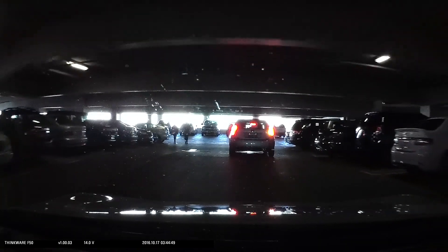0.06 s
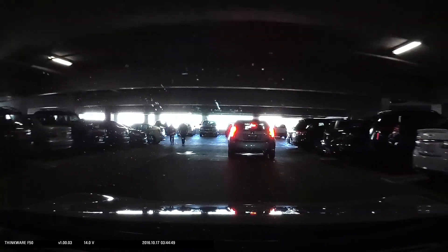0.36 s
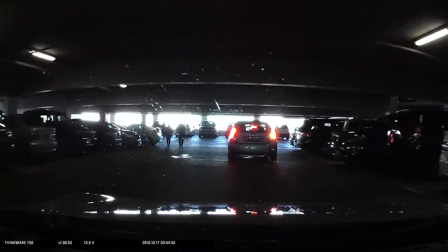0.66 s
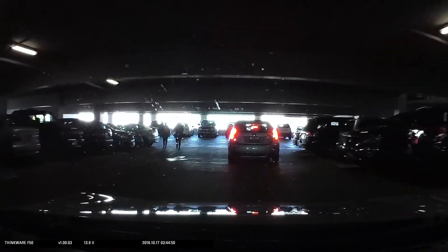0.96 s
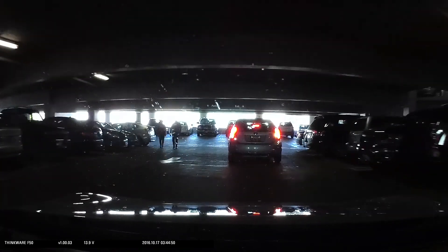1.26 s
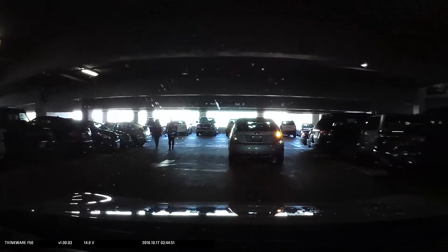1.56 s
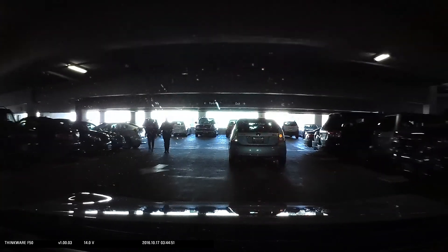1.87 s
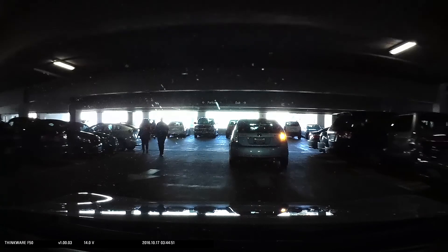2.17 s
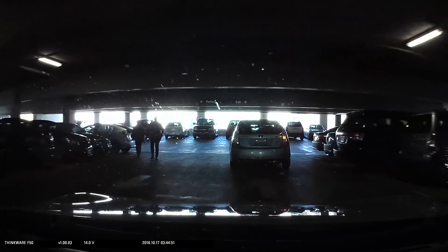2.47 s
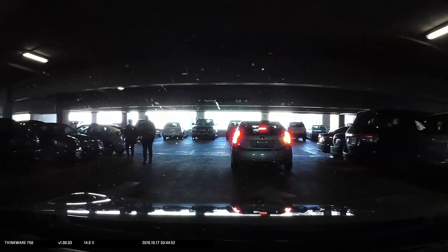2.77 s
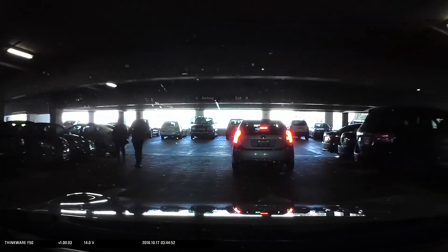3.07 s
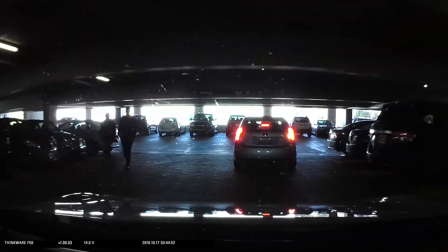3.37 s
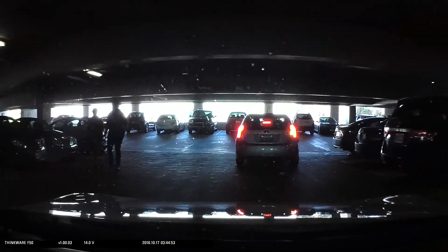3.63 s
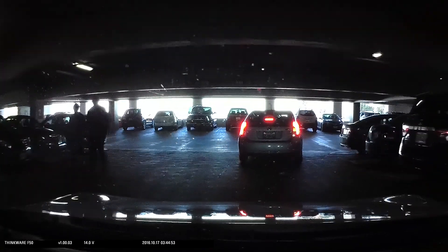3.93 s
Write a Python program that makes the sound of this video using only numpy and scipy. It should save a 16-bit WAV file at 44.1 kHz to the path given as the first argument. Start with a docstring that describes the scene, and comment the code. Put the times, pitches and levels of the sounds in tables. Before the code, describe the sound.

A car's low engine drone, heard from inside, falls in pitch as it slows through a parking garage. In the first 0.7 seconds tyres thump over floor joints, overloading the microphone and rattling trim. Softer bumps pass at 1 and 2 seconds as road noise ebbs. Around 3 seconds come small taps and a faint distant thud. A thin whine fades as the engine nears idle by 4 seconds.

```python
"""A car slows down in a concrete parking garage, heard from inside through a one-channel dashboard camera.
In the first 0.7 s the tyres thump over floor joints, overloading the microphone and shaking loose trim.
The exhaust drone sinks through the cabin's boom resonance, with a thin alternator whine tied to it.
Softer joints pass at 1 s and 2 s as road noise ebbs with the speed. Around 3 s come a few small taps
and a far thud; the whine dies away near idle, over steady ventilation and hiss."""
import sys
import numpy as np
from scipy.fft import rfft, irfft, next_fast_len
from scipy.io import wavfile
from scipy.ndimage import map_coordinates

SR = 44100
rng = np.random.default_rng(int(sys.argv[2]) if len(sys.argv) > 2 else 0)


def store_wav(level_fs):
    """Save 16-bit WAV to argv[1]."""
    pcm = np.round(np.clip(np.atleast_2d(level_fs), -1, 1) * 32767)
    wavfile.write(sys.argv[1], SR, pcm.T.astype(np.int16))


N = 176400


# engine firing rate: t/s, f/Hz
FIRING_HZ = [(0, 96.83), (.3, 84.52), (.38, 80.23), (.68, 67.25), (.87, 62.88), (1.0, 58.64), (1.44, 57.96),
             (1.68, 57), (2, 53.21), (2.42, 48.6), (2.7, 46.14), (3.05, 43.6), (3.5, 41.58), (4, 39.77)]
# firing note, before cabin gain: t/s, level/dB
FUNDAMENTAL_DB = [(0, -17), (.5, -23), (.8, -20), (1.0, -19.5), (1.4, -19.5), (1.8, -29.5), (2.05, -23.5),
                  (2.5, -26), (3.4, -18.5), (4, -24)]
# its octave, following the load, before cabin gain: t/s, level/dB
OCTAVE_DB = [(0, -29.5), (.42, -26), (.6, -16), (.7, -18.5), (.88, -16), (.97, -22.5), (1.04, -18),
             (1.3, -17), (1.62, -14), (1.8, -22.5), (2.1, -30), (2.6, -29.5), (3.4, -39), (4, -61)]
# higher orders, before cabin gain: multiple of firing rate, level/dB
UPPER_ORDERS = [(3, -30.5), (4, -33), (5, -49), (6.5, -35), (7, -40)]
# cabin response to the exhaust: f/Hz, gain/dB
CABIN_GAIN_DB = [(40, -8), (60, -1), (85, -0.5), (100, -1), (115, -2), (130, 0.5), (142, 5), (160, -5),
                 (171, -9), (184, -23), (335, -39), (374, -18), (410, -24)]

def exhaust(firing_hz, phase, burble_depth=.07, burble_hz=30, waver_db=.5):
    """Engine orders swell and fade through the cabin's resonances; uneven firings make them burble."""
    def order(multiple, db):
        gain = amp(db + along(CABIN_GAIN_DB, multiple * firing_hz))
        burble = 1 + burble_depth * wobble(burble_hz)
        jitter_rad = burble_depth * wobble(burble_hz)
        return np.sqrt(2) * gain * burble * np.sin(multiple * phase + jitter_rad)
    drone = order(.99, curve(FUNDAMENTAL_DB)) + order(2, curve(OCTAVE_DB))
    return drone + sum(order(multiple, db + waver_db * wobble(8.5)) for multiple, db in UPPER_ORDERS)


# floor joints: t/s, boom level/dB, boom f/Hz, boom width/s, knock level/dB
JOINTS = [(.078, -11, 145.9, 0.015, -46.5), (.131, -6, 134, .0068, -25.5), (.167, -10.5, 144.1, .02, -39),
          (0.367, -7, 124.2, 0.011, -36), (0.59, -23, 135, 0.011, -33.5), (0.617, -13, 134, 0.0065, -26.5),
          (0.649, -12, 108, 0.015, -47), (.991, -19.5, 146, .06, -54.5), (1.971, -22, 159.3, 0.014, -55.5)]
# knock spectrum: f/Hz, level/dB
KNOCK_SPECTRUM = [(100, -8.5), (240, -1), (370, 6), (600, -8.5), (1000, -16), (1700, -27), (4000, -43),
                  (9000, -55)]
# spectrum of the knock's edge: f/Hz, level/dB
CRACK_SPECTRUM = [(500, 0), (1200, -3), (3000, -14), (12000, -27)]

def floor_joints(rise_s=.0025, decay_s=.011, crack_rel_db=-13, crack_delay_s=.0005):
    """Each joint under the tyres makes the cabin boom, with a short, crisp-edged knock."""
    boom, knock, crack = np.zeros((3, N))
    for at_s, boom_db, boom_hz, width_s, knock_db in JOINTS:
        boom += amp(boom_db) * swell(at_s, width_s) * np.cos(2 * np.pi * boom_hz * (clock() - at_s))
        knock += amp(knock_db) * strike(at_s, rise_s, decay_s)
        crack += amp(knock_db + crack_rel_db) * swell(at_s + crack_delay_s, width_s=.0008)
    return boom + knock * noise(KNOCK_SPECTRUM) + crack * noise(CRACK_SPECTRUM)


# body rumble: t/s, level/dB
RUMBLE_DB = [(0, -19.5), (.7, -20), (1.2, -25), (1.7, -27.5), (2, -22.5), (2.3, -29), (3, -31.5),
             (3.5, -28.5), (4, -29)]
# rumble spectrum: f/Hz, level/dB
RUMBLE_SPECTRUM = [(10, -6.5), (22, -4), (35, -3.5), (55, -7), (82, -15), (130, -11.5), (160, -11),
                   (185, -27), (260, -47), (500, -80.5)]
# rolling noise: t/s, level/dB
ROLLING_DB = [(0, -35.5), (.17, -28.5), (.3, -33), (.42, -33.5), (.55, -36), (.8, -40.5), (1.1, -43.5),
              (1.6, -45), (2.1, -47.5), (2.6, -52), (3.05, -54), (3.22, -56.5), (3.35, -54.5), (4, -55)]
# rolling spectrum: f/Hz, level/dB
ROLLING_SPECTRUM = [(120, -15), (220, -1), (330, -13), (520, -11.5), (700, -20.5), (1000, -24),
                    (1700, -28.5), (3000, -39), (6000, -49), (14000, -74.5)]
# cabin resonances: f/Hz, width/Hz, lift/dB
CABIN_RESONANCES = [(218.3, 21, 8), (287.5, 7.5, 8.5), (377, 15, 6), (553, 7.6, 6), (948, 12, 9)]
# grit and small creaks: t/s, level/dB, width/s
GRIT_BURSTS = [(0.183, -56.5, 0.0075), (3.479, -67, 0.0057)]
# grit spectrum: f/Hz, level/dB
GRIT_SPECTRUM = [(1500, -14), (3000, -1), (7700, -9), (13000, -30.5)]

def tyres(patter_db=1.2, grain_db=4):
    """Rolling tyres give body rumble, road noise coloured by the cabin, and a little grit."""
    rumble = amp(curve(RUMBLE_DB)) * noise(RUMBLE_SPECTRUM)
    rolling = amp(curve(ROLLING_DB) + patter_db * wobble(30)) * noise(ROLLING_SPECTRUM, CABIN_RESONANCES)
    bursts = sum(amp(db) * swell(at_s, width_s) for at_s, db, width_s in GRIT_BURSTS)
    grit = unit(amp(grain_db * wobble(500)) * noise(GRIT_SPECTRUM))
    return rumble + rolling + bursts * grit


# trim rattles: t/s, level/dB, decay/s
RATTLES = [(.166, -36.5, .04), (.38, -38, .03)]
# rattle spectrum: f/Hz, level/dB
RATTLE_SPECTRUM = [(200, -20), (500, 0), (1000, -2), (8000, -50)]
# small taps: t/s, level/dB, f/Hz
TRIM_TAPS = [(2.795, -47, 520), (3.239, -47, 480), (3.47, -63, 3300)]

def trim(grain_db=2):
    """Loose trim rattles after the hardest jolts and later gives a few small taps."""
    jolts = sum(amp(db) * strike(at_s, rise_s=.008, decay_s=decay_s) for at_s, db, decay_s in RATTLES)
    rattle = unit(amp(grain_db * wobble(260)) * noise(RATTLE_SPECTRUM))
    taps = np.zeros(N)
    for at_s, db, hz in TRIM_TAPS:
        ring = np.sin(2 * np.pi * hz * (clock() - at_s) + wobble(130))
        taps += amp(db) * strike(at_s, rise_s=.002, decay_s=.011) * ring
    return jolts * rattle + taps


# whine lines: multiple of firing rate
LINE_ORDERS = [116, 174, 232]
# each line at mean engine speed, before fade and dips: level/dB
LINE_DB = [-76, -91, -82.5]
# firing rate below which each line fades: f/Hz
LINE_FADE_HZ = [47, 56.5, 43]

def alternator(firing_hz, phase, db_per_octave=6.5, flicker_db=.7, dip_db=-12, flutter_rad=1.1):
    """A thin whine geared to the engine and blurred by belt flutter; it dips twice and fades near idle."""
    level_db = db_per_octave * np.log2(firing_hz / firing_hz.mean()) + flicker_db * wobble(12)
    level_db += dip_db * sum(swell(at_s, width_s=.04) for at_s in (.35, .99))
    whine = np.zeros(N)
    for multiple, db, fade_hz in zip(LINE_ORDERS, LINE_DB, LINE_FADE_HZ):
        fade = 1 / (1 + np.exp(fade_hz - firing_hz))
        whine += np.sqrt(2) * amp(db) * fade * np.sin(multiple * phase + flutter_rad * wobble(130))
    return amp(level_db) * whine


# thud spectrum: f/Hz, level/dB
THUD_SPECTRUM = [(250, -12.5), (550, 4), (1000, -2), (2000, -31.5)]

def far_thud(level_db=-56.5):
    """A muffled thud outside the car, smeared by the garage."""
    return amp(level_db) * swell(at_s=3.21, width_s=.059) * noise(THUD_SPECTRUM)


# ventilation and microphone hiss: f/Hz, level/dB
HISS_SPECTRUM = [(280, -6.5), (400, 4), (550, -3), (800, -8), (1700, -8), (3000, -17), (4500, -22.5),
                 (7500, -29.5), (13000, -27.5)]

def hiss(level_db=-58):
    """Ventilation air and the microphone's own noise, both steady."""
    return amp(level_db) * noise(HISS_SPECTRUM)


def electronics(period_s=.1, tick_db=-69.5, scatter_db=1, tick_hz=10500, tone_db=-87, tone_hz=11520):
    """The camera's faint electrical ticking and steady high tone."""
    times_s = np.arange(.1, N / SR, period_s)
    gains = amp(tick_db + scatter_db * rng.standard_normal(len(times_s)))
    pulses = sum(gain * swell(at_s, width_s=.00044) for at_s, gain in zip(times_s, gains))
    band = [(tick_hz - 2000, -25), (tick_hz - 500, 0), (tick_hz + 700, 0), (tick_hz + 1500, -30)]
    tone = np.sqrt(2) * amp(tone_db) * np.sin(2 * np.pi * tone_hz * clock())
    return pulses * noise(band) + tone


def amp(db):
    """Decibels to gain."""
    return 10 ** (np.asarray(db) / 20)


def unit(x):
    """Scale to rms 1."""
    return x / np.sqrt(np.mean(x ** 2) + 1e-20)


def clock():
    """Sample times in s."""
    return np.arange(N) / SR


def curve(points):
    """Interpolate (t/s, value) points at every sample."""
    return np.interp(clock(), *np.transpose(points))


def along(points, hz):
    """Interpolate (f/Hz, value) points on a log axis."""
    knots_hz, values = np.transpose(points)
    return np.interp(np.log(hz + 1), np.log(knots_hz + 1), values)


def wobble(rate_hz):
    """Smooth random curve, rate_hz knots a second."""
    knots = rng.standard_normal(int(N * rate_hz / SR) + 4)
    return map_coordinates(knots, [clock() * rate_hz])


def filtered(x, response):
    """Zero-phase filter with gain response(hz)."""
    size = next_fast_len(N + 8192)
    return irfft(rfft(x, size) * response(np.fft.rfftfreq(size, 1 / SR)), size)[:N]


def noise(spectrum, modes=()):
    """Coloured noise of rms 1, lifted at any resonances."""
    def response(hz):
        lift_db = sum(db / (1 + (2 * (hz - mode_hz) / width_hz) ** 2) for mode_hz, width_hz, db in modes)
        return amp(along(spectrum, hz) + lift_db)
    return unit(filtered(rng.standard_normal(N), response))


def swell(at_s, width_s):
    """Gaussian envelope."""
    return np.exp(-.5 * ((clock() - at_s) / width_s) ** 2)


def strike(at_s, rise_s, decay_s):
    """Gaussian rise, exponential decay."""
    age_s = clock() - at_s
    return np.where(age_s < 0, swell(at_s, rise_s), np.exp(-np.abs(age_s) / decay_s))


def scene():
    """All sources reach one microphone on the left channel; the right is silent."""
    firing_hz = curve(FIRING_HZ)
    phase = 2 * np.pi * np.cumsum(firing_hz) / SR
    engine = exhaust(firing_hz, phase) + alternator(firing_hz, phase)
    cabin = engine + floor_joints() + trim() + tyres() + far_thud() + electronics() + hiss()
    return np.array([cabin, np.zeros(N)])


# microphone port resonances: f/Hz, gain/dB
PORT_GAIN_DB = [(1100, 0.5), (1650, 1.5), (2050, -5), (2600, -1.5), (3050, 8), (3650, -3.5), (4050, -5.5),
                (4550, 3.5), (5400, -4), (6400, 0.5), (7500, -1.5), (9500, 0.5), (10600, 5), (11400, 1.5),
                (12100, -5.5), (13500, -4.5), (14400, -19.5)]
DRIVE_DB, CLIP_HARDNESS, CUTOFF_HZ = 6.5, 16, 15700

def record(dry):
    """The microphone port colours the sound; the input clips at full scale and is band-limited."""
    coloured = np.array([filtered(channel, lambda hz: amp(along(PORT_GAIN_DB, hz))) for channel in dry])
    driven = amp(DRIVE_DB) * coloured
    clipped = driven / (1 + np.abs(driven) ** CLIP_HARDNESS) ** (1 / CLIP_HARDNESS)
    return np.array([filtered(channel, lambda hz: hz < CUTOFF_HZ) for channel in clipped])


dry = scene()
out = record(dry)
store_wav(out)
```